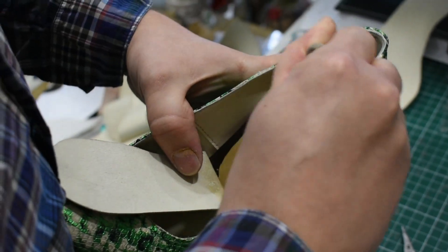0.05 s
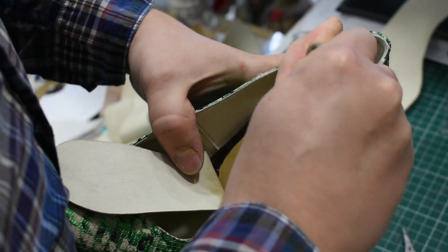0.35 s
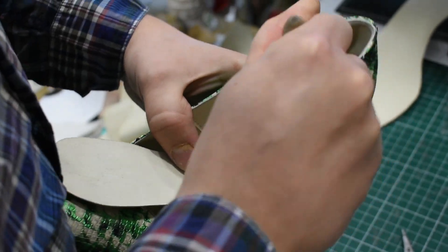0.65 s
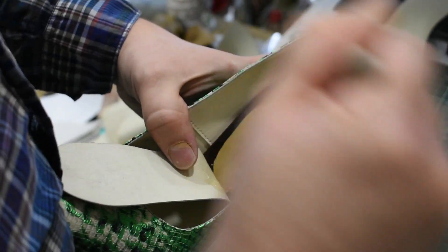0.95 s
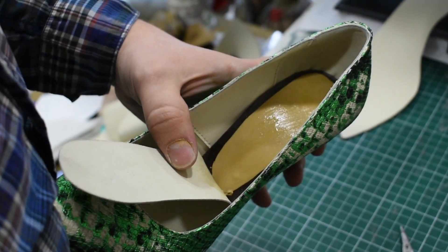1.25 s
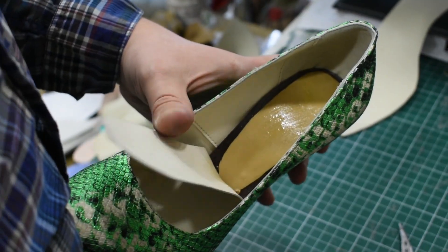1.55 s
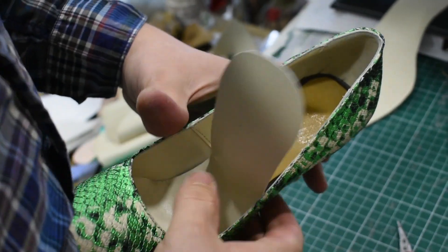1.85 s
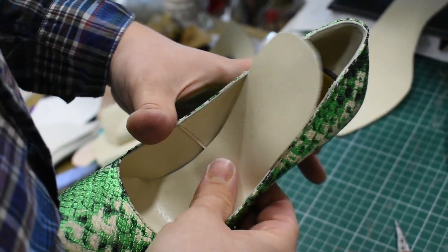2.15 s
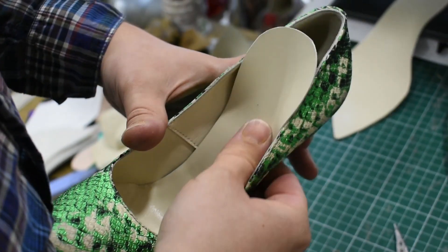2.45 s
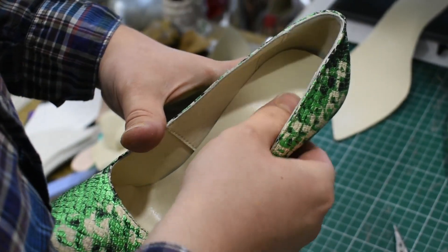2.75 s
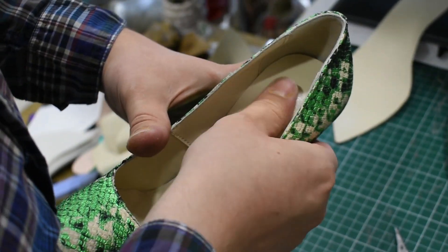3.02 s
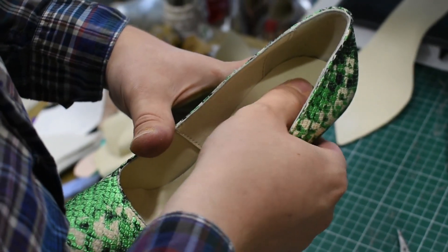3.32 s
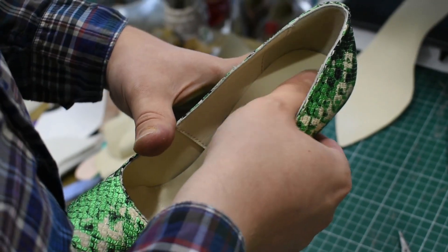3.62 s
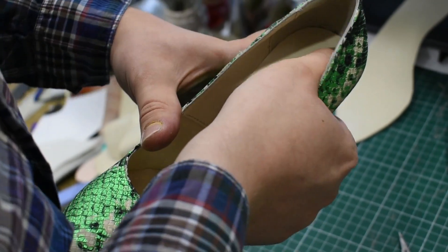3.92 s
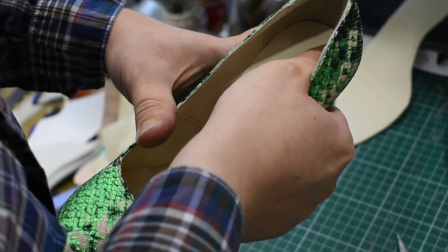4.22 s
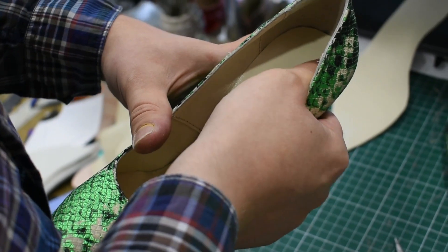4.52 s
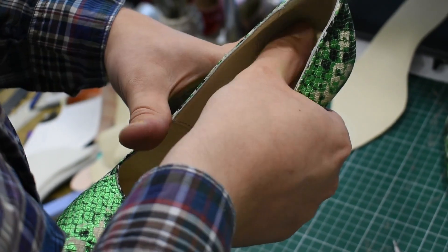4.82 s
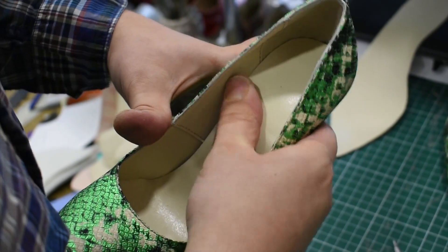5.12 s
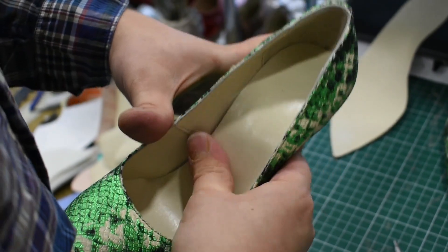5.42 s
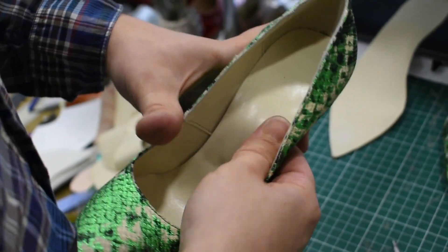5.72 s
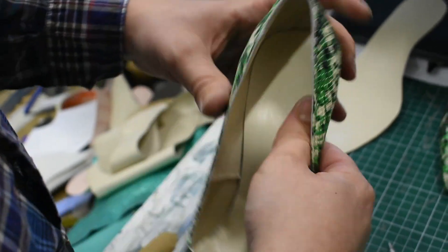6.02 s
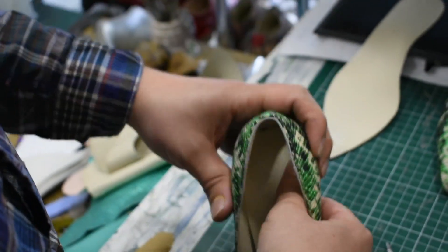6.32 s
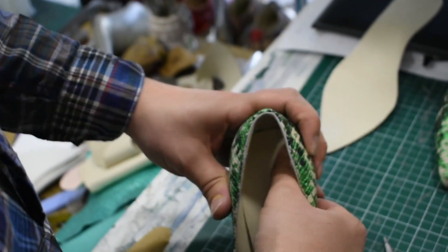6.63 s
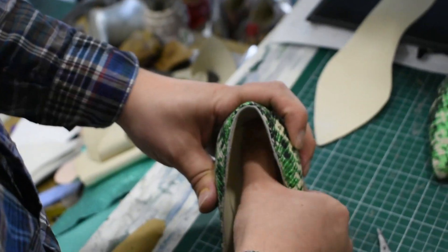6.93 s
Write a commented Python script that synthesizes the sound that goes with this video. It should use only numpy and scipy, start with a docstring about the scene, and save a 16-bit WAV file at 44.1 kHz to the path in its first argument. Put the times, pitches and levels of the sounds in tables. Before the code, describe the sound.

Soft, close rubbing and pressing of a leather insole inside a shoe, with light bumps, ticks and one sharp knock on a workbench.

```python
"""A shoemaker's workbench in a small room, one microphone close to the hands as an insole is laid in.
A tool is set down with a sharp knock and a bounce that ring the tool and shake the bench. The leather
insole flaps over and slides, and a thumb rubs it flat in short strokes, hissing as the skin catches.
Fingers bump the hollow shoe as they grip and turn it; nails and creasing leather tick.
The walls answer briefly, and faint, steady room tone lies behind."""
import sys
import numpy as np
from scipy import signal
from scipy.fft import rfft, irfft, next_fast_len
from scipy.io import wavfile

SR = 44100
rng = np.random.default_rng(int(sys.argv[2]) if len(sys.argv) > 2 else 0)


def dump(signal):
    """Clip the signal to [-1, 1] and save it as 16-bit WAV at the path in sys.argv[1]."""
    limited = np.clip(np.atleast_2d(signal).T, -1, 1)
    pcm = np.round(limited * 32767).astype(np.int16)
    wavfile.write(sys.argv[1], SR, pcm)


N = 316197


# the tool meets the bench, gentler contacts duller: start_s, level_db, top_hz
TOOL_CONTACTS = [(1.532, -1, 13000), (1.5917, -15, 7900), (1.5965, -31, 8000), (1.61, -28, 5000)]
# what the tool rings with: pitch_hz, level_db, t60_s
TOOL_MODES = [(520, -16, 0.063), (660, -27, 0.11), (800, -18.5, 0.052), (1036, -14.5, 0.043),
              (1558, -3, 0.014), (2040, -7.5, 0.026), (2654, -10, 0.017), (3310, -12.5, 0.027),
              (4060, -3.5, 0.01), (5060, -12.5, 0.0052), (7100, -2, 0.0064), (8700, -5.5, 0.0032),
              (9700, -9, 0.013)]
# colour of the bench top: frequency_hz, level_db
BENCH_SPECTRUM = [(60, -57), (180, -56), (330, -7), (450, -14), (560, -3), (660, -2.5), (760, -14.5),
                  (1030, -3), (1250, -6.5), (2000, -4.5), (3300, -12), (4300, -10.5), (9000, -16.5),
                  (14000, -24.5)]
# how long the bench top rings: frequency_hz, t60_s
BENCH_DECAY = [(200, 0.38), (700, 0.14), (2000, 0.14), (5000, 0.084), (12000, 0.057)]

def tool_knock(bench_db=11.5, contact_s=0.0001, thud_db=-49, crack_db=-9):
    """Beside the hands the tool cracks and rings; the broad bench top thuds and sounds into the room."""
    t, out = seconds(0.6), np.zeros(N)
    bench = from_db(bench_db) * tail(BENCH_SPECTRUM, BENCH_DECAY, build_s=0.0003)
    bench = workshop(bench, wet_db=-10)
    tool = sum((-1) ** k * from_db(db) * ring(t, hz, t60) for k, (hz, db, t60) in enumerate(TOOL_MODES))
    tool *= 1 - np.exp(-t / contact_s)
    crack = from_db(crack_db) * cut(snap(t, t60=0.002, crumble=0.22), 5000, "high")
    thud = from_db(thud_db) * cut(ring(t, hz=150, t60=0.045), 90, "high", order=1)
    blow = cut(tool + bench + crack, 250, "high") + thud
    for start, db, top_hz in TOOL_CONTACTS:
        add(out, start, from_db(db) * cut(blow, top_hz, "low"))
    return out


# fingers and insole land on the shoe, close to the microphone:
# start_s, hollow_db, hollow_hz, sole_db, sole_hz, slap_db, slap_top_hz
SHOE_BUMPS = [(1.2895, -32, 1250, -52, 400, -33, 8000), (1.2914, -22, 925, -39, 262, -25.5, 9100),
              (1.2937, -36, 950, -53, 262, -26.5, 8500), (1.338, -44, 684, -29.5, 420, -49, 3000),
              (1.359, -38, 670, -42.5, 228, -54, 4000), (1.775, -57, 560, -34.5, 323, -58, 1500),
              (1.7857, -30, 1500, -26.5, 700, -27, 3350), (2.6893, -30.5, 910, -68, 400, -35, 8900),
              (2.702, -38, 1050, -70, 400, -35, 9000), (2.745, -33, 870, -62, 400, -29, 5500),
              (2.753, -29, 1100, -62, 400, -37, 3500), (5.3382, -31, 1400, -70, 500, -31, 6050),
              (5.4561, -35.5, 890, -60, 400, -37, 9100), (5.8604, -29.5, 833, -54, 520, -31.5, 2780),
              (6.3984, -24, 917, -37, 400, -22.5, 3240), (6.437, -20.5, 880, -29, 392, -31, 2400),
              (6.446, -31.5, 276, -36.5, 193, -38.5, 11000), (6.7455, -28.5, 1015, -32, 520, -36.5, 2800)]

def shoe_bumps():
    """Each bump rings the hollow and the heavier sole; the soft surfaces meet bit by bit in a slap."""
    t, out = seconds(0.25), np.zeros(N)
    for start, hollow_db, hollow_hz, sole_db, sole_hz, slap_db, slap_top_hz in SHOE_BUMPS:
        hollow = from_db(hollow_db) * shoe_ring(t, hollow_hz, cycles=15.1)
        sole = from_db(sole_db) * shoe_ring(t, sole_hz, cycles=12.6)
        slap = from_db(slap_db) * click(t, t60=0.015, crumble=0.65, low_hz=850, top_hz=slap_top_hz)
        add(out, start, hollow + sole + slap)
    return out


# the shoe's many damped modes around the pitch of a bump: pitch_ratio, level_db
SHOE_WALL_SPECTRUM = [(.2, -37), (.45, -10), (1, 4), (1.8, -7), (4, -34.5), (10, -41)]

def shoe_ring(t, hz, cycles, overtone_db=-12, flutter_db=-11, linger=4.15, give_s=0.00027):
    """A padded blow rings one part of the shoe for some cycles; its soft walls flutter on a little."""
    t60 = cycles / hz
    tone = ring(t, hz, t60) + from_db(overtone_db) * ring(t, 1.71 * hz, 0.55 * t60)
    walls = coloured(rng.standard_normal(len(t)), [(hz * ratio, db) for ratio, db in SHOE_WALL_SPECTRUM])
    flutter = walls * from_db(flutter_db - 60 * t / (linger * t60)) * (1 - np.exp(-t * hz / 2))
    body = (tone + flutter) * (1 - np.exp(-t / give_s))
    return cut(body, 0.51 * hz, "high", order=3)   # a small body radiates little below its pitch


# the thumb on the insole, close up:
# start_s, end_s, level_db, firmness_db, hiss_hz, hiss_top_hz, hollow_hz
THUMB_STROKES = [(.03, 0.087, -60.5, -9, 8800, 15000, 1400), (0.092, 0.137, -52.5, -8.5, 9100, 12000, 1330),
                 (0.128, 0.387, -69.5, 1, 7900, 14500, 540), (0.43, .68, -66, -3, 10000, 15000, 1400),
                 (.785, 0.819, -55.5, -10.5, 9150, 11500, 1350), (1.04, 1.23, -66.5, -5, 9600, 16000, 520),
                 (1.298, 1.338, -70, 21, 6500, 9000, 800), (1.326, 1.387, -50, -2, 7700, 7000, 744),
                 (1.875, 2.012, -62, -6.5, 9000, 13700, 800), (2.264, 2.293, -54.5, -7.5, 9900, 9000, 1280),
                 (2.299, 2.336, -53.5, -4.5, 9350, 9200, 825), (2.347, 2.388, -53.5, -2.5, 9600, 9000, 830),
                 (2.394, 2.429, -51.5, -1.5, 8750, 9600, 1020),
                 (2.413, 2.489, -56, -3.5, 8260, 10700, 1260), (2.467, 2.584, -66.5, 0, 10200, 16000, 1340),
                 (2.59, 2.67, -54, -0.5, 6700, 12400, 1090), (2.657, 2.775, -54, 1, 5300, 13100, 950),
                 (2.924, 3.026, -70, -4, 10200, 16000, 810), (3.307, 3.42, -67, -8, 10200, 16000, 730),
                 (3.615, 3.923, -64, -4, 8100, 16000, 1290), (4.264, 4.33, -56.5, -8.5, 7200, 16000, 810),
                 (4.58, 4.647, -62, -11, 5400, 16000, 1490), (4.732, 4.759, -53.5, -10, 7360, 10500, 1350),
                 (4.764, 4.79, -51, -10.5, 7440, 9250, 1180), (4.87, 5.015, -54.5, -13.5, 7950, 16000, 980),
                 (4.979, 5.023, -69.5, 14.5, 8300, 12000, 590), (4.994, 5.146, -51, -16, 8700, 11900, 1120),
                 (5.336, 5.398, -52, -13, 5300, 14200, 1280), (5.391, 5.445, -50.5, -5.5, 8650, 16000, 860),
                 (5.605, 5.691, -65, 4, 12000, 16000, 1470), (5.715, 5.89, -69, 5, 9600, 14700, 815),
                 (5.952, 6.034, -53, -6.5, 9000, 13900, 840), (6.041, 6.074, -53, -4, 9400, 11300, 1510),
                 (6.103, 6.149, -58, -1, 8800, 12700, 850), (6.143, 6.238, -59, -7, 9700, 12000, 830),
                 (6.233, 6.363, -52, -5.5, 10800, 16000, 870),
                 (6.546, 6.784, -60, -6.5, 10900, 16000, 1360),
                 (6.85, 6.903, -51.5, -9.5, 10500, 16000, 930), (7.076, 7.196, -54, -10, 8500, 13500, 1340)]
# the leather rings higher while the thumb holds it taut: time_s, pitch_hz
LEATHER_RESONANCE = [(1.95, 1980), (2.4, 2370), (2.64, 3500), (3.77, 2590), (4.3, 1910), (5.39, 4080),
                     (5.65, 1910)]
# colours of sliding skin, scuffed leather and the hollow of the shoe: frequency_hz, level_db
SKIN_SPECTRUM = [(2500, -51), (4500, -6.5), (6000, -6), (8500, -1.5), (11000, -3), (15000, -2.5)]
LEATHER_SPECTRUM = [(900, -19), (1600, -1.5), (2200, 0.5), (3400, -0.5), (4600, -13), (6500, -19)]
HOLLOW_SPECTRUM = [(200, -58), (350, -31), (520, -1), (700, -0.5), (900, 0), (1200, -1), (1700, -7),
                   (2600, -52)]

def thumb_rubbing(judder_per_s=90):
    """Tiny catches make the skin hiss; a firmer stroke brings out the leather and the hollow shoe."""
    catches, slips = friction(smooth=1.14), drift(judder_per_s)
    hiss = coloured(catches, SKIN_SPECTRUM)
    scuff = coloured(catches, LEATHER_SPECTRUM)
    hollow = coloured(catches, HOLLOW_SPECTRUM)
    out = np.zeros(N)
    for start, end, db, firm_db, hiss_hz, top_hz, hollow_hz in THUMB_STROKES:
        span, envelope = stroke_shape(start, end)
        judder_db = max(1.5 + 0.12 * firm_db, 0) * slips[span]   # firm strokes stick and slip more
        leather_hz = np.interp((start + end) / 2, *np.transpose(LEATHER_RESONANCE))
        leather_db = 0.57 * firm_db - 1
        skin = resonate(cut(hiss[span], top_hz, "low"), hiss_hz, width_hz=2000, share=0.31)
        leather = from_db(leather_db) * resonate(scuff[span], leather_hz, width_hz=200, share=0.25)
        shoe = from_db(firm_db) * resonate(hollow[span], hollow_hz, width_hz=68, share=0.42)
        out[span] += from_db(db + judder_db) * envelope * (skin + leather + shoe)
    return out


# the insole slides along the lining: start_s, end_s, level_db, squeak_hz
INSOLE_SLIDES = [(2.063, 2.115, -59, 2050), (2.112, 2.233, -59.5, 2090)]

def insole_slide(hollow_db=-3, hollow_hz=700):
    """Leather on leather sticks and sings more than skin does, and hardly hisses."""
    catches, out = friction(smooth=1.0), np.zeros(N)
    for start, end, db, squeak_hz in INSOLE_SLIDES:
        span, envelope = stroke_shape(start, end)
        squeak = resonate(coloured(catches[span], LEATHER_SPECTRUM), squeak_hz, width_hz=260, share=0.56)
        shoe = resonate(coloured(catches[span], HOLLOW_SPECTRUM), hollow_hz, width_hz=230, share=0.57)
        out[span] += from_db(db) * envelope * (squeak + from_db(hollow_db) * shoe)
    return out


# fingernails and creasing leather, close up: start_s, level_db, centre_hz
NAIL_AND_LEATHER_TICKS = [(0.0358, -37, 9600), (.13, -37, 9050), (.1787, -40, 9000), (.275, -43, 9000),
                          (.325, -45, 2980), (.463, -39.5, 9200), (.7195, -36, 8500), (.769, -41, 8500),
                          (1.3735, -35, 7500), (1.4, -41, 7000), (2.477, -39, 5900), (2.628, -39, 7000),
                          (4.771, -36.5, 8000), (5.3382, -33, 2170), (5.628, -33.5, 10000),
                          (5.641, -33.5, 3480), (5.862, -34, 8800), (5.971, -34, 9700), (5.9895, -35, 8500),
                          (6.096, -40, 8000), (6.581, -37.5, 3400)]

def leather_ticks(creases_per_s=4, crease_db=-46.5, spread_db=3, lowest_crease_hz=4500, edge_ratio=1.28):
    """Nails and leather give small bright snaps; fainter creases fall at random in between."""
    t, out = seconds(0.04), np.zeros(N)
    creases = [(when * N / SR, crease_db + spread_db * (2 * size - 1), lowest_crease_hz * 2 ** octaves)
               for when, size, octaves in rng.random((int(creases_per_s * N / SR), 3))]
    for start, db, hz in list(NAIL_AND_LEATHER_TICKS) + creases:
        tick = click(t, t60=0.0093, crumble=0.34, low_hz=hz / edge_ratio, top_hz=hz * edge_ratio)
        add(out, start, from_db(db) * tick)
    return out


# colour of the echoes from the nearby walls: frequency_hz, level_db
WALL_SPECTRUM = [(100, 2.5), (300, 3), (900, -3.5), (2000, -2), (4000, 2.5), (8000, -0.5), (15000, -2.5)]
# how long the small room rings: frequency_hz, t60_s
ROOM_DECAY = [(150, 0.21), (300, 0.18), (800, 0.3), (2000, 0.36), (5000, 0.24), (12000, 0.19)]

def workshop(x, wet_db):
    """The direct sound reaches the microphone first, then the short tail of the room."""
    echoes = tail(WALL_SPECTRUM, ROOM_DECAY, build_s=0.0031)
    return x + from_db(wet_db) * signal.fftconvolve(x, echoes)[:len(x)]


# the quiet workshop all around the microphone: frequency_hz, level_db
ROOM_TONE_SPECTRUM = [(12, -41), (20, -13), (27, -26), (120, -16.5), (142, -11), (216, -6.5), (241, -8),
                      (319, -0.5), (399, -10), (485, -6), (590, -7), (1910, -6.5), (2460, -9.5),
                      (5680, -14), (16000, -21)]

def room_tone(level_db=-59):
    """Faint, steady noise, strongest in the low middle."""
    return from_db(level_db) * coloured(rng.standard_normal(N), ROOM_TONE_SPECTRUM)


def friction(smooth, catches_per_s=1500, spread_db=1.0):
    """Tiny catches of uneven size over the smooth hiss of sliding; rms 1."""
    sizes = from_db(spread_db * np.minimum(rng.exponential(1, N), 4)) * rng.choice([-1, 1], N)
    catches = rms_one(sizes * (rng.random(N) < catches_per_s / SR))
    return rms_one(catches + smooth * rng.standard_normal(N))


def stroke_shape(start, end, edge_share=0.48, longest_edge_s=0.034, swell_db=3):
    """The samples of a stroke and its envelope: the hand lands, is fastest midway, and lifts."""
    edge_s = min(edge_share * (end - start), longest_edge_s) + 1 / SR
    span = np.arange(max(int((start - edge_s / 2) * SR), 0), min(int((end + edge_s / 2) * SR), N))
    inside_s = np.minimum(span / SR - start, end - span / SR) + edge_s / 2
    contact = np.sin(np.pi / 2 * np.clip(inside_s / (1.34 * edge_s), 0, 1)) ** 2
    return span, contact * from_db(swell_db * (np.hanning(len(span)) - 0.5))


def resonate(x, hz, width_hz, share):
    """Mix a steady excitation with its own ringing in one resonance; rms 1."""
    radius = np.exp(-np.pi * width_hz / SR)
    ringing = signal.lfilter([1, 0, -1], [1, -2 * radius * np.cos(2 * np.pi * hz / SR), radius ** 2], x)
    return rms_one(share * rms_one(ringing) + (1 - share) * rms_one(x))


def ring(t, hz, t60):
    """A struck mode dying away."""
    return np.sin(2 * np.pi * hz * t) * from_db(-60 * t / t60)


def snap(t, t60, crumble):
    """A sudden release with a crumble of noise after it."""
    return (t == 0) + crumble * rng.standard_normal(len(t)) * from_db(-60 * t / t60)


def click(t, t60, crumble, low_hz, top_hz):
    """A snap between two steep band edges; peak 1."""
    dulled = cut(snap(t, t60, crumble), top_hz, "low", order=3)
    sound = cut(dulled, low_hz, "high", order=3)
    return sound / np.abs(sound).max()


def tail(spectrum, decay, build_s):
    """Countless modes or echoes: noise that builds up and dies band by band; energy 1."""
    t, edges_hz = seconds(0.6), np.geomspace(50, 17000, 22)
    white, out = rfft(rng.standard_normal(len(t))), 0
    hz = np.arange(len(white)) * SR / len(t)
    for low, high in zip(edges_hz, edges_hz[1:]):
        centre = np.sqrt(low * high)
        band = irfft(white * ((hz >= low) & (hz < high)), len(t))
        band *= from_db(-60 * t / at_hz(decay, centre)) * (1 - np.exp(-(t / build_s) ** 2))
        out += rms_one(band) * np.sqrt(high - low) * from_db(at_hz(spectrum, centre))
    return out / np.sqrt(np.sum(out ** 2))


def coloured(x, spectrum):
    """Give a steady excitation a spectrum; rms 1."""
    size = next_fast_len(len(x))
    hz = np.arange(size // 2 + 1) * SR / size
    return rms_one(irfft(rfft(x, size) * from_db(at_hz(spectrum, hz)), size)[:len(x)])


def drift(per_s):
    """A line wandering between random values; rms 1."""
    knots = rng.standard_normal(int(N / SR * per_s) + 2)
    return rms_one(np.interp(np.arange(N) / SR * per_s, np.arange(len(knots)), knots))


def cut(x, hz, kind, order=2):
    """Butterworth low- or high-pass."""
    return signal.sosfilt(signal.butter(order, hz, kind, fs=SR, output="sos"), x)


def at_hz(table, hz):
    """Read a table along a log-frequency axis."""
    frequencies, values = np.transpose(table)
    return np.interp(np.log(np.maximum(hz, 1)), np.log(frequencies), values)


def from_db(db):
    """Decibels to gain."""
    return 10 ** (np.asarray(db) / 20)


def rms_one(x):
    """Scale to an rms of one."""
    return x / np.sqrt(np.mean(x ** 2) + 1e-20)


def seconds(length_s):
    """A time axis."""
    return np.arange(int(length_s * SR)) / SR


def add(track, start_s, sound):
    """Mix a sound into a track at a time."""
    start = round(start_s * SR)
    part = sound[:max(N - start, 0)]
    track[start:start + len(part)] += part


def scene():
    """Hands and shoe close to one microphone, the tool beside them, room tone behind."""
    background = room_tone()
    tool = tool_knock()
    strokes = workshop(thumb_rubbing() + insole_slide(), wet_db=-14.5)
    handling = workshop(shoe_bumps() + leather_ticks(), wet_db=-10.5)
    return (tool + strokes + handling + background)[None]


def record(dry):
    """The microphone chain rounds the loudest peak and cuts the top above 15.7 kHz."""
    rounded = 0.99 * np.tanh(dry / 0.96)
    low_pass = signal.ellip(12, 0.2, 90, 15700, fs=SR, output="sos")
    return signal.sosfilt(low_pass, rounded)


dry = scene()
out = record(dry)
dump(out)
```